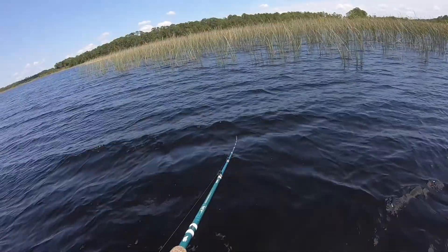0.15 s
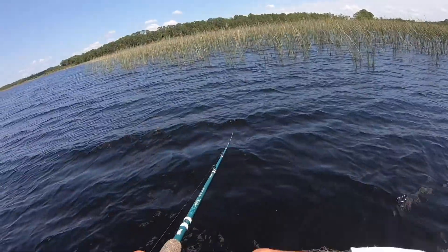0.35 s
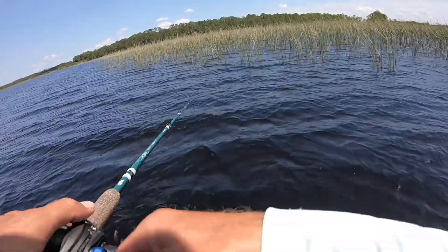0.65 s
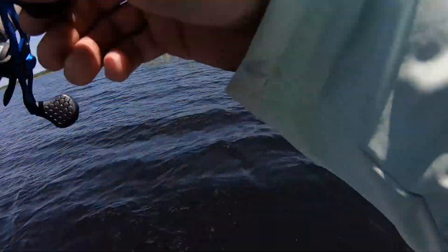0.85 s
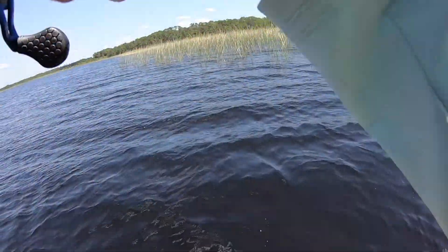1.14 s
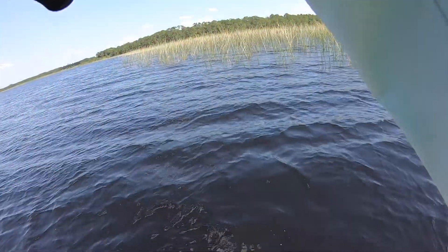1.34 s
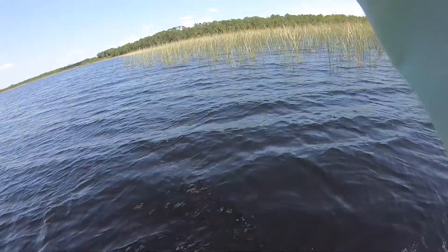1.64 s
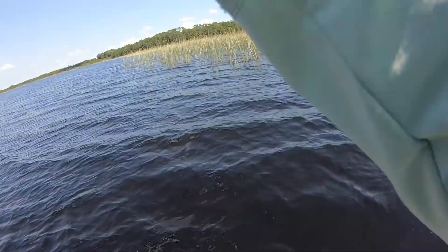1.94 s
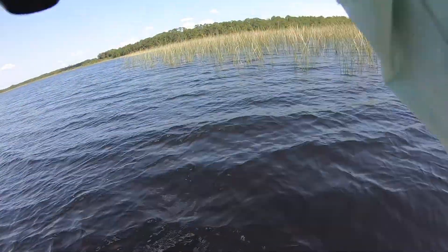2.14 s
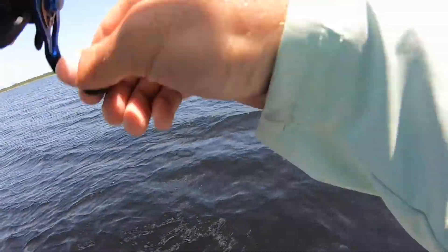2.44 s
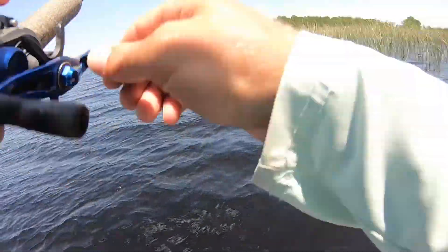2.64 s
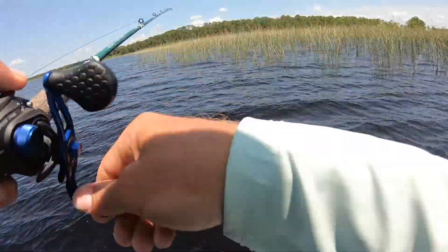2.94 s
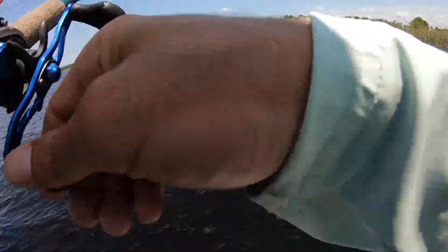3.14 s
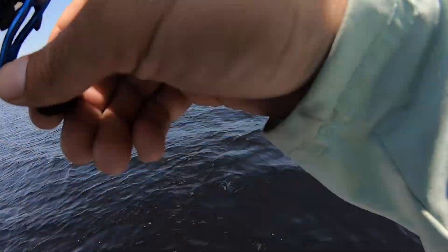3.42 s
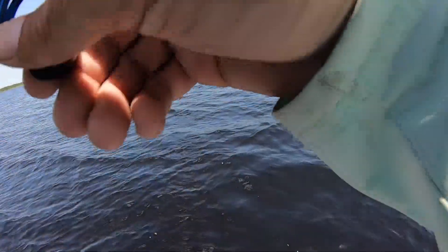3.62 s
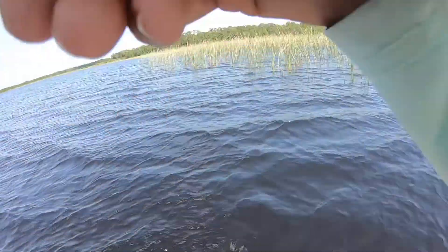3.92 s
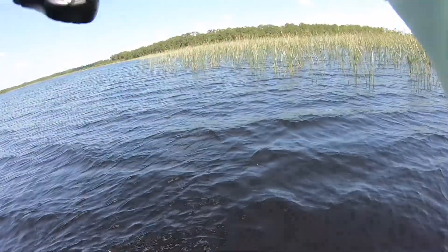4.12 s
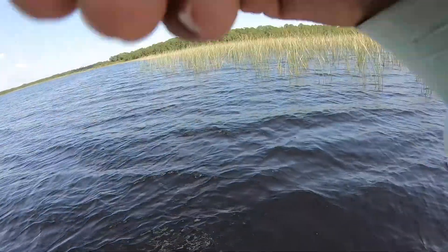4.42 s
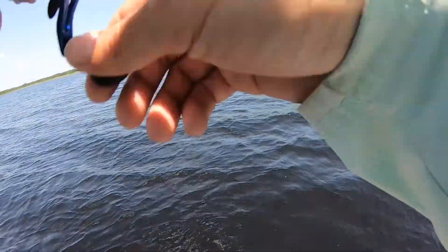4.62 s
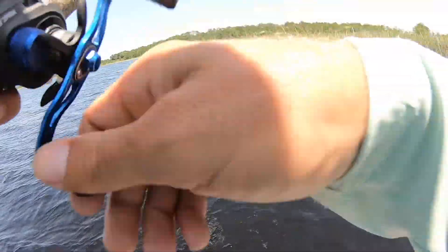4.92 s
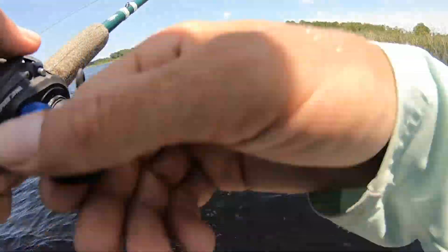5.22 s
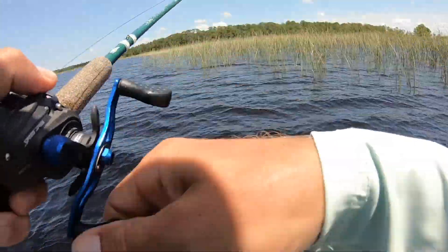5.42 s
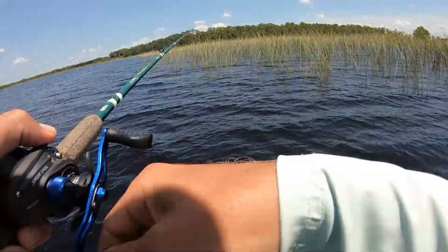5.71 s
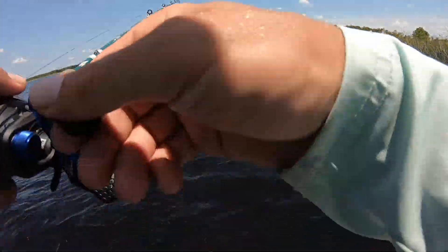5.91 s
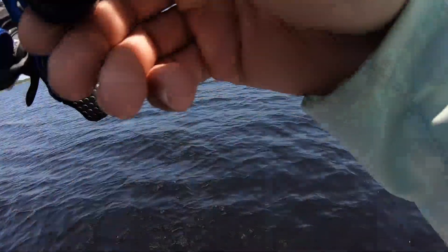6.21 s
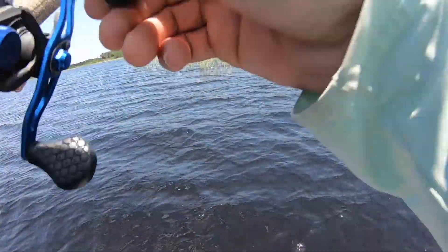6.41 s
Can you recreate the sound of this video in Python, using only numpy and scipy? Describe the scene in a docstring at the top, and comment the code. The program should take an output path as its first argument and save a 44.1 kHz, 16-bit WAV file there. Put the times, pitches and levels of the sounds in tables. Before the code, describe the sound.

A small fishing reel cranks steadily up close with a low ticking whir, while water plops and slaps a boat hull and loose tackle clacks.

```python
"""Baitcasting reel on a small boat

A reel is cranked steadily, close to a chest-worn camera: gear teeth hum as tones locked to the spool speed.
Every spool turn repeats a round of knocks (struck resonances) and bright ticks (noise bursts); line hisses in.
Ripples wash, plop and slap at the hull: shaped noise, ringing bubbles and hollow thumps.
A breeze sways on the microphone as low noise; loose tackle taps, rattles twice and gives one sharp clack."""
import sys
import numpy as np
from scipy import signal
from scipy.fft import rfft, irfft, next_fast_len
from scipy.io import wavfile
from scipy.ndimage import uniform_filter1d

SR = 44100
rng = np.random.default_rng(int(sys.argv[2]) if len(sys.argv) > 2 else 0)


def transcribe(u):
    """Save the signal u as a 16-bit wav file named by the first command-line argument.

    u: samples, shape (n,) or (channels, n), limited to [-1, 1]; the rate is SR.
    q: integer samples, one column per channel.
    """
    v = np.clip(np.atleast_2d(u).T, -1, 1)
    q = np.round(v * 32767).astype(np.int16)
    wavfile.write(sys.argv[1], SR, q)


N = 289274
T = np.arange(N) / SR  # time [s]

# Breeze on the microphone: (time [s], relative rumble level [dB])
GUSTS = [(0.0, -38), (.2, -50), (.35, -41), (.53, -58), (.72, -44.5), (.86, -58), (1.0, -42), (1.4, -51),
         (1.7, -55), (1.95, -44), (2.3, -43), (2.75, -59), (2.9, -48), (3.1, -51), (3.85, -58), (4.1, -39),
         (4.3, -50), (4.44, -69), (4.62, -46), (4.8, -55), (4.98, -47), (5.5, -42), (6.0, -48), (6.3, -45),
         (6.56, -45)]
# Ripples along the hull: (time [s], relative wash level [dB], relative splash level [dB])
RIPPLES = [(0.0, -38.5, -54), (0.74, -41.5, -54), (1.28, -40.5, -59.5), (1.42, -41, -59),
           (1.8, -42.5, -55.5), (2.06, -39.5, -51.5), (3.2, -40.5, -58), (3.68, -43, -56.5),
           (3.98, -39, -54.5), (4.2, -42.5, -56), (4.96, -42, -54.5), (5.14, -37.5, -57),
           (5.3, -40.5, -55.5), (6.56, -41, -60.5)]
# Tone of the low wash: (frequency [Hz], relative level [dB])
WASH_COLOUR = [(50, 2), (100, -7), (150, 0.5), (215, 2), (300, 0.5), (370, -2.5), (430, -8.5), (600, -10.5),
               (900, -11), (1200, -19.5), (2000, -30.5)]
# Tone of the lighter splashing: (frequency [Hz], relative level [dB])
SPLASH_COLOUR = [(500, 3.5), (900, 0), (1080, -0.5), (1400, -3), (2200, -2), (2500, -8), (3400, -10.5),
                 (4200, -16.5), (8000, -24)]
# Clouds of tiny bubbles: (middle time [s], relative level [dB], central pitch [Hz], spread in time [s])
SPATTERS = [(0.121, -55, 1910, 0.022), (0.425, -47, 1520, 0.021), (.6, -53, 1870, 0.022),
            (1.995, -54, 1400, .008), (2.11, -60, 1400, 0.022), (2.211, -46.5, 904, 0.027),
            (3.2, -51, 2100, 0.028), (4.021, -60, 1630, 0.015), (5.145, -66, 2000, 0.011),
            (6.06, -51.5, 1150, 0.04)]
# Single bubbles and drips: (time [s], relative level [dB], starting pitch [Hz], decay [s])
PLOPS = [(.28, -50, 2030, 0.0086), (.665, -61, 4000, 0.013), (.725, -42, 890, 0.022),
         (.825, -41, 488, 0.024), (.875, -52, 3930, 0.004), (1.275, -54, 3120, 0.0088),
         (1.318, -43.5, 2620, 0.0072), (1.964, -35, 785, 0.0091), (2.179, -51, 970, 0.0057),
         (2.206, -36, 2340, 0.0023), (2.258, -43, 1400, .006), (2.43, -43, 1430, .007),
         (2.495, -46, 2460, .004), (2.562, -43, 870, 0.0083), (2.564, -37, 614, .01),
         (2.586, -42, 620, .009), (2.776, -45.5, 975, .012), (2.92, -37.5, 2480, 0.0018),
         (3.192, -44, 1820, 0.009), (3.224, -42, 1890, 0.005), (3.234, -41, 1710, 0.004),
         (3.647, -51, 3800, .005), (4.003, -43, 1530, .006), (4.029, -31, 840, 0.0073),
         (4.287, -42, 1813, 0.011), (4.58, -44, 1470, 0.0054), (4.743, -35, 740, 0.0074),
         (5.17, -42, 1010, 0.0058), (6.035, -55, 4400, .004), (6.22, -53, 3960, 0.0061)]
# Waves slapping the hull:
# (time [s], relative level [dB], starting pitch of the hollow [Hz], decay [s], overtone gain [dB])
SLAPS = [(1.996, -29, 398, 0.008, -10), (2.49, -32, 215, .014, -11), (2.518, -28, 320, 0.021, -7),
         (2.575, -29, 185, .012, -12), (2.58, -32, 367, 0.0091, -10), (2.63, -32.5, 309, 0.011, -16),
         (2.711, -28.5, 387, 0.01, -18), (2.729, -25, 318, 0.0089, -16), (2.782, -28.5, 377, 0.012, -23),
         (3.215, -31, 295, 0.022, -18), (4.012, -36, 370, 0.011, -7), (5.089, -22.5, 364, 0.01, -0.5),
         (5.132, -25.5, 376, 0.01, -17), (5.148, -27, 209, 0.0076, -8), (5.234, -28, 236, 0.013, -12),
         (5.336, -26, 232, 0.01, -18), (5.526, -32, 220, 0.044, -18)]
# Overtones of the hull's hollow: (multiple of its pitch [ratio], relative level [dB])
HULL_OVERTONES = [(1.2, -0.5), (1.55, -7), (1.95, -9), (2.3, -17)]
# Dry taps of loose tackle: (time [s], relative level [dB], reference pitch [Hz], decay [s])
TAPS = [(.682, -31.5, 900, 0.0027), (1.9555, -43, 1400, .003), (1.9565, -33, 650, .003),
        (1.9638, -35.5, 2050, .002), (1.9665, -48, 3420, .002), (1.976, -36, 800, .003),
        (1.9828, -31.5, 1800, .002), (1.9888, -33, 1150, .003), (2.007, -43, 950, .002),
        (3.153, -43, 3110, .002), (3.1545, -39.5, 2520, 0.0032), (3.155, -40, 1550, .0025),
        (3.1835, -46, 2500, .002), (3.19, -39.5, 2500, 0.0023), (3.2, -46, 2400, .002),
        (3.218, -46, 2300, .0018), (3.23, -41, 1450, .003), (4.004, -46, 1700, .003),
        (4.287, -43, 1650, 0.0034), (5.567, -44, 3120, 0.0027), (5.576, -41, 2750, 0.0027),
        (6.154, -33.5, 875, 0.0041)]
# Rings within a tap: (multiple of its reference pitch [ratio], relative level [dB])
TAP_MODES = [(.8, -4), (1, -2), (1.17, -9.5), (1.38, -13)]
# The clack and its rebounds: (time [s], relative level [dB])
CLACKS = [(6.5105, -30.5), (6.5133, -31.5), (6.5173, -44)]
# Rings of the clacking tackle: (nominal frequency [Hz], relative level [dB], time to fall 60 dB [s])
TACKLE_MODES = [(215, -9, 0.07), (345, 1.5, 0.061), (465, -3, 0.053), (660, -8.5, 0.058),
                (1010, -5.5, 0.037), (1430, -3.5, 0.024), (1954, -10.5, 0.06), (2820, -13, 0.025),
                (2960, -7.5, 0.026), (3620, -21, 0.014), (5050, -25, 0.035)]
# Line tension while winding: (time [s], relative tick level [dB], relative line hiss level [dB])
WINDING = [(0.0, -59, -69), (0.26, -66, -74), (0.46, -63, -71.5), (1.04, -73, -76.5), (1.34, -65.5, -74.5),
           (1.64, -80, -77), (1.78, -65.5, -74.5), (2.2, -65.5, -69.5), (2.9, -71.5, -71.5),
           (3.14, -68.5, -75), (4.18, -64.5, -75), (4.34, -65.5, -72.5), (6.56, -64.5, -73)]
# Tone of the line hiss: (frequency [Hz], relative level [dB])
LINE_COLOUR = [(2000, -10), (3500, -1.5), (5500, -4), (7000, -8.5), (10000, -7), (16000, -10.5)]
# Bright ticks in each spool turn: (place in the turn [0-1], relative level [dB], decay [s])
TICKS = [(.04, 2.5, 0.0037), (0.136, 6.5, 0.0092), (.29, 3, 0.0053), (.64, -6, 0.0045), (.71, 8, 0.0059)]
# Single extra ticks: (time [s], relative level [dB], decay [s])
SNAPS = [(.069, -56.5, .001), (.073, -55, .005), (0.363, -49.5, 0.0042), (.393, -56, .002),
         (.4655, -51.5, 0.0046), (.566, -51, 0.005), (0.7513, -53, .003), (1.436, -55.5, 0.004),
         (1.805, -57, 0.0033), (1.841, -55, 0.003), (2.04, -51, 0.0032), (2.142, -53, .002),
         (2.239, -55, 0.003), (2.34, -54, .003), (3.615, -57, .003), (3.715, -58, .003),
         (3.817, -55, 0.004), (4.055, -56, .004), (4.108, -61, .003), (4.232, -59, 0.0045),
         (4.501, -65, 0.0028), (4.545, -57, .003), (4.601, -55, 0.0045), (4.894, -63, .003),
         (4.941, -61, .003), (4.993, -53, 0.0026), (5.33, -54, .003), (5.383, -61, .003),
         (5.676, -57, .003), (5.816, -56, .003), (5.971, -64, .003), (6.112, -59, 0.0027),
         (6.211, -62, 0.0025), (6.369, -59, .003), (6.469, -59, 0.0037)]
# Tone of the ticks: (frequency [Hz], gain [dB])
TICK_COLOUR = [(2000, 11.5), (3500, 11), (4400, 7.5), (5250, 9.5), (5700, 4.5), (6200, 3.5), (8500, 5),
               (12000, 0), (16000, -7)]
# Ring of the small steel parts that tick, one row: (frequency [Hz], width [Hz])
TICK_RING = (5700, 510)
# Contacts in each spool turn:
# (place in the turn [0-1], resonance [Hz], width [Hz], relative level [dB], grit [0-1])
CONTACTS = [(.05, 855, 54, -66, 0), (0.089, 350, 37, -59.5, 0.54), (.12, 992, 22.4, -61, 0.15),
            (0.3, 2930, 75, -84, 0.3), (0.211, 640, 140, -67.5, 0.24), (0.219, 356, 41, -60, 0.27),
            (.24, 220, 117, -54, 0.02), (.22, 2000, 50, -79, 0), (0.1, 1242, 26, -69.5, 0.4),
            (.29, 2253, 74, -70.5, 0.39), (0.289, 2880, 221, -76.5, 0.2), (.29, 3330, 240, -77, 0.8),
            (0.289, 1990, 780, -70, 1), (0.269, 501.4, 25.6, -59, 0.07), (0.319, 860, 59, -65.5, 0),
            (0.318, 978, 65, -68.5, 0), (.33, 1140, 67, -69, 0.2), (.44, 914, 44, -61.5, 0.06),
            (0.679, 337, 46, -54, 0.04), (0.68, 716, 180, -69.5, 0.06), (0.5, 3800, 140, -87, 0.2),
            (.715, 5600, 280, -85.5, 0), (.79, 2080, 160, -77.5, 0.76), (.82, 488, 33, -61.5, 0.5),
            (.83, 796, 100, -74.5, 0.37)]
# Spool speed: (time [s], speed [turns per second])
SPOOL = [(0.0, 10.32), (0.42, 9.99), (0.52, 10.31), (1.04, 10.25), (1.14, 9.97), (1.42, 10.45),
         (1.56, 9.87), (2.34, 10.13), (2.54, 10.41), (3.08, 9.95), (3.36, 10.32), (3.66, 9.91),
         (3.98, 10.48), (4.3, 10.01), (5.0, 10.26), (5.84, 10.25), (5.98, 9.92), (6.56, 10.19)]
# Pull of the lure on the gears: (time [s], relative mesh hum level [dB])
LOAD = [(0.0, -46), (1.26, -41), (1.42, -44.5), (1.66, -42), (1.8, -48.5), (2.2, -37.5), (2.52, -47.5),
        (2.9, -40.5), (3.28, -41.5), (3.44, -53), (3.7, -39.5), (3.88, -53.5), (4.12, -42), (4.28, -45),
        (4.84, -40.5), (5.3, -54.5), (5.4, -43.5), (5.64, -46.5), (5.74, -44.5), (6.56, -44.5)]
# Weaker gear tones, one column: (multiple of the spool speed [ratio])
GEAR_ORDERS = [7, 8, 9, 10, 13, 16, 18, 21, 22, 24, 34]
# Their levels in the same order, one column: (rms level [dB])
GEAR_DB = [-60.5, -55, -57.5, -57, -59.5, -57.5, -58.5, -55, -58.5, -58.5, -54.5]
# Reel frame ringing under the gears: (frequency [Hz], width [Hz], rms level [dB])
FRAME = [(345, 17, -61), (1701, 30, -71), (1848, 35, -70.5)]

TEETH = 12  # pinion teeth
GEAR_RATIO = 6.6  # spool turns per handle turn
# The hand pushes hardest once a handle turn: swing each way [dB], place in the turn [0-1]
PUSH_DB, PUSH_PLACE = 0.5, 0.72
TICK_WIDTH = 0.25  # gain of the tick noise that is opposite in left and right
LEFT_DB, TREBLE_LEFT_DB = 2, -0.1  # left over right [dB]: body, then ticks and line
TOP_HZ = 15850  # upper edge of the camera's band
OPPOSITE = np.array([[1], [-1]])  # left and right with opposite sign


def undb(db):
    """Turn decibels into gain."""
    return 10 ** (np.asarray(db) / 20)


def level(x, db):
    """Scale to an rms level in dB."""
    return x * undb(db) / np.sqrt(np.mean(x ** 2))


def curves(table):
    """Draw each column of a time table as a curve, one value per sample."""
    s, *columns = np.transpose(table)
    return [np.interp(T, s, c) for c in columns]


def noise():
    """White noise for the whole scene."""
    return rng.standard_normal(N)


def walk(rate):
    """Smooth random drift with a spread near 1, from `rate` fresh values a second."""
    k = int(SR / rate)
    steps = np.repeat(rng.standard_normal(N // k + 1), k)
    return 1.59 * uniform_filter1d(uniform_filter1d(steps, k), k)[:N]


def resonate(x, hz, width):
    """A two-pole resonance applied twice, for steep skirts."""
    b, a = signal.iirpeak(hz, hz / (1.5 * width), fs=SR)  # each pass wider, so the pair is near `width`
    return signal.lfilter(b, a, signal.lfilter(b, a, x))


def colour(x, points):
    """Shape a sound by (Hz, dB) points; outside them it falls 20 dB an octave."""
    size = next_fast_len(N + SR // 4)
    hz, db = np.transpose(points)
    octave = np.log2(np.maximum(np.fft.rfftfreq(size, 1 / SR), 1))
    outside = np.abs(octave - np.clip(octave, np.log2(hz[0]), np.log2(hz[-1])))
    gain = undb(np.interp(octave, np.log2(hz), db) - 20 * outside)
    return irfft(rfft(x, size) * gain, size)[:N]


def fade(t, decay, onset_s):
    """Envelope of one short event: a soft onset and an exponential decay."""
    return np.exp(-t / decay) * (1 - np.exp(-t / onset_s))


def drop_in(out, s, sound):
    """Mix a short sound into the track at a time in seconds."""
    i = int(s * SR)
    out[i:i + len(sound)] += sound


def breeze(sway_db=-33.5, rumble_db=-1.1, sway_follow=0.55):
    """Slow pressure swings, mostly below hearing, and a soft rumble both swell in the gusts."""
    gust_db = curves(GUSTS)[0]
    swings = colour(noise(), [(1, 0), (2, -3), (4, -8), (10, -15), (18, -23)])
    sway = level(swings * undb(sway_follow * gust_db), sway_db)
    rumble = level(colour(noise(), [(18, 11), (26, -2), (38, -12), (65, -9)]), rumble_db)
    return sway + rumble * undb(gust_db)


def spatter(count=30, spread_octaves=0.36, cycles=4, scatter_db=4):
    """A ripple breaks into a short cloud of tiny bubbles around one pitch, each ringing a few cycles."""
    out = np.zeros(N + SR)
    t = T[:SR // 30]
    for s, db, hz, spread_s in SPATTERS:
        for when, pitch, size in rng.standard_normal((count, 3)):
            cycle = hz * 2 ** (spread_octaves * pitch) * t
            bubble = np.sin(2 * np.pi * cycle) * fade(cycle, cycles, 0.5)  # faded in cycles, not seconds
            gain = undb(db + scatter_db * min(size, 1))
            drop_in(out, s + spread_s * np.clip(when, -2, 2), gain * bubble)
    return out[:N]


def plops(rise=0.054, onset_s=0.0011, froth=0.3):
    """Pockets of air ring, rising in pitch as they fade, inside a little froth of the same pitch."""
    out = np.zeros(N + SR)
    t = T[:SR // 5]
    for s, db, hz, decay in PLOPS:
        glide = t - decay * 2 * (1 - np.exp(-t / decay / 2))
        tone = np.sin(2 * np.pi * hz * (t + rise * glide))
        fizz = level(resonate(rng.standard_normal(len(t)), hz, hz / 2), 0)
        drop_in(out, s, undb(db) * (tone + froth * fizz) * fade(t, decay, onset_s))
    return out[:N]


def slaps(onset_s=0.0043, rise=0.099, slosh=0.13):
    """A wave thumps the hull: its hollow rings with overtones and a wet band of noise."""
    out = np.zeros(N + SR)
    t = T[:SR // 5]
    for s, db, hz, decay, bright_db in SLAPS:
        phase = 2 * np.pi * hz * (t + rise * t ** 2)
        overtones = sum(undb(mode_db) * np.sin(ratio * phase) for ratio, mode_db in HULL_OVERTONES)
        wet = level(resonate(rng.standard_normal(len(t)), hz, hz), 0)
        ring = np.sin(phase) + undb(bright_db) * overtones + slosh * wet
        drop_in(out, s, undb(db) * ring * fade(t, decay, onset_s))
    return out[:N]


def water(wash_db=-2.0, splash_db=-1.4, churn_db=1.08, sparkle_db=2):
    """A low wash and a lighter splashing run along the hull, with bubble clouds, plops and hollow slaps."""
    wash_curve, splash_curve = curves(RIPPLES)
    churn = noise() * undb(churn_db * walk(30))
    wash = level(colour(churn, WASH_COLOUR), wash_db) * undb(wash_curve)
    sparkle = noise() * undb(sparkle_db * walk(150))
    splash = level(colour(sparkle, SPLASH_COLOUR), splash_db) * undb(splash_curve)
    return wash + splash + spatter() + plops() + slaps()


def taps(onset_s=0.00046):
    """Loose tackle gives quick, dry taps, each a broad cluster of rings that dies at once."""
    out = np.zeros(N + SR)
    t = T[:SR // 20]
    for s, db, hz, decay in TAPS:
        ring = sum(undb(mode_db) * np.sin(2 * np.pi * (ratio * hz * t + rng.random()))
                   for ratio, mode_db in TAP_MODES)
        drop_in(out, s, undb(db) * ring * fade(t, decay, onset_s))
    return out[:N]


def clack(crack_db=-4, crack_s=0.0046, body_db=-11, body_s=0.046, detune=0.013):
    """Hard parts of the tackle strike and rebound: a brief crack, a duller thud and short rings."""
    out = 0
    for s, db in CLACKS:
        age = np.maximum(T - s, 0)
        ring = 0
        for hz, mode_db, t60 in TACKLE_MODES:
            pitch = hz * (1 + detune * rng.standard_normal())
            ring = ring + undb(mode_db - 60 * age / t60) * np.sin(2 * np.pi * pitch * age)
        bright = colour(noise(), [(600, 16), (3200, 4), (4000, -7), (15000, -24)])
        crack = level(bright, crack_db) * np.exp(-age / crack_s)
        dull = colour(noise(), [(150, 4), (400, 8.0), (1000, 1), (2500, -12)])
        thud = level(dull, body_db) * np.exp(-age / body_s)
        out = out + undb(db) * (ring + crack + thud) * (age > 0)
    return out


def line(hiss_db=2.0, flutter_db=1, air_db=-78):
    """Wet line hisses through the guides, over a thin even hiss that is opposite in left and right."""
    flutter = undb(curves(WINDING)[1] + flutter_db * walk(60))
    hiss = level(colour(noise(), LINE_COLOUR), hiss_db) * flutter
    air = level(colour(noise(), [(4500, -21), (7000, -6), (11000, -7), (16000, -10)]), air_db)
    return hiss + air * OPPOSITE


def passes(turns, place, scatter_db, slack):
    """Once a turn a part comes round, a little early or late: seconds since it did, and how hard."""
    count = np.floor(turns - place + slack * walk(20)).astype(int) + 2
    arrived = np.diff(count, prepend=count[0]) > 0
    start = np.maximum.accumulate(np.where(arrived, T, -1))
    hardness_db = scatter_db * (2 * rng.random(size=128) - 3.0)  # always a cut, 1 to 3 times the scatter
    return T - start, undb(hardness_db)[count]


def chatter(age, decay, snap=0.9, snap_s=0.00042, rise_s=0.0017):
    """Envelope of one tick: a sharp snap, then a rattle that dies away."""
    return fade(age, decay, rise_s) + snap * np.exp(-age / snap_s) * (age > 0)


def ticks(turns, tick_db=2.0, grain_db=3.0, ring_db=11):
    """Small metal parts snap, chatter in fine grains and ring; the two microphone ports differ a little."""
    tension = undb(curves(WINDING)[0] + tick_db)
    power = 0
    for place, db, decay in TICKS:
        age, size = passes(turns, place, scatter_db=2, slack=0.005)
        power = power + (tension * undb(db) * size * chatter(age, decay)) ** 2
    for s, db, decay in SNAPS:
        power = power + (undb(db) * chatter(np.maximum(T - s, 0), decay)) ** 2
    envelope = np.sqrt(power)
    grains = level(undb(grain_db * walk(2500)), 0)
    mid = colour(envelope * grains * noise(), TICK_COLOUR)
    side = colour(envelope * grains * noise(), TICK_COLOUR)
    ring = undb(ring_db) * resonate(envelope * noise(), *TICK_RING)
    return mid + ring + TICK_WIDTH * side * OPPOSITE


def knocks(turns, scatter_db=2.0, scrape_s=0.015, follow=0.023):
    """Contacts push and scrape, each ringing a part of the reel; a taut line makes them very slightly harder."""
    out = 0
    for place, hz, width, db, grit in CONTACTS:
        age, size = passes(turns, place, scatter_db, slack=0.0015)
        push = level(size * (age == 0), 0)  # one sample as the part arrives
        scrape = level(size * np.exp(-age / scrape_s) * noise(), 0)
        force = (1 - grit) * push + grit * scrape
        out = out + level(resonate(force, hz, width), db)
    tension_db = curves(WINDING)[0]
    return out * undb(follow * (tension_db - tension_db.mean()))


def gears(turns, mesh_db=0, waver_db=3.0, flutter_db=1.0, wander_turns=0.083, rough=0.16):
    """Pinion teeth hum with load and hand push; their unevenness adds other multiples of spool speed."""
    push_db = PUSH_DB * np.cos(2 * np.pi * (turns / GEAR_RATIO - PUSH_PLACE))
    tone = np.sin(2 * np.pi * (TEETH * turns + wander_turns * walk(16)))  # wander in cycles of the hum
    mesh = tone * undb(flutter_db * walk(22)) * (1 + rough * walk(70))
    out = level(mesh, mesh_db) * undb(curves(LOAD)[0] + push_db)
    for order, db in zip(GEAR_ORDERS, GEAR_DB):
        phase = order * turns + rng.random() + 0.098 * walk(8)
        waver = undb(waver_db * np.minimum(walk(9), 1))
        out += level(np.sin(2 * np.pi * phase) * waver, db)
    frame = sum(level(resonate(noise(), hz, width), db) for hz, width, db in FRAME)
    return out + frame


def scene():
    """Everything is close and dry over open water; the body leans left, ticks and line a hair right."""
    turns = np.cumsum(curves(SPOOL)[0]) / SR
    body = gears(turns) + knocks(turns) + water() + taps() + clack() + breeze()
    treble = ticks(turns) + line()
    lean = OPPOSITE / 2  # half the difference on each side
    return body * undb(LEFT_DB * lean) + treble * undb(TREBLE_LEFT_DB * lean)


def record(dry):
    """The camera cuts the top with a steep low-pass."""
    return signal.sosfilt(signal.ellip(10, 0.2, 80, TOP_HZ, fs=SR, output="sos"), dry)


dry = scene()
out = record(dry)
transcribe(out)
```